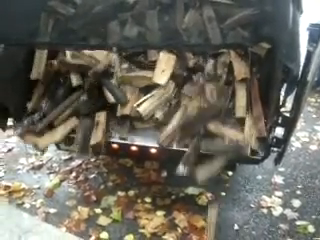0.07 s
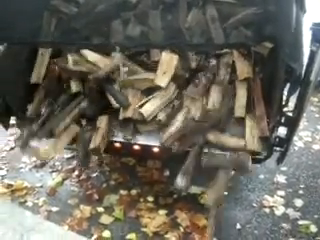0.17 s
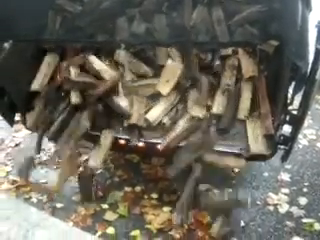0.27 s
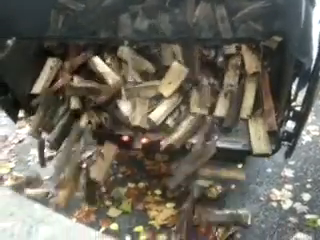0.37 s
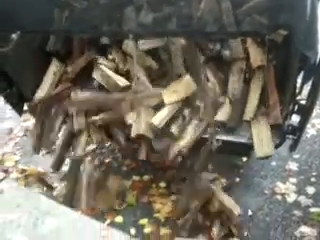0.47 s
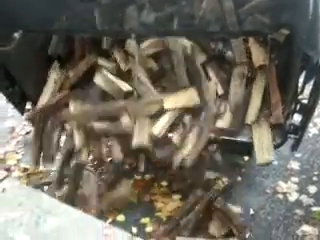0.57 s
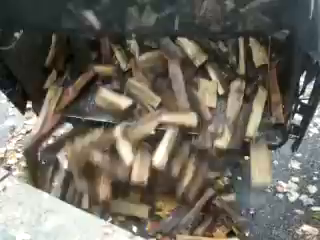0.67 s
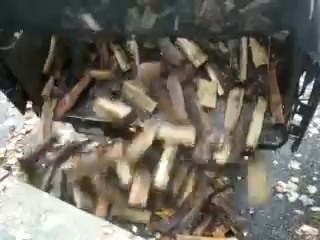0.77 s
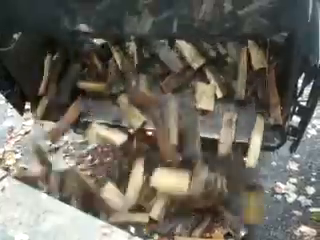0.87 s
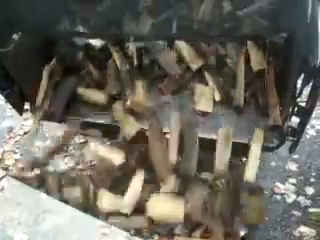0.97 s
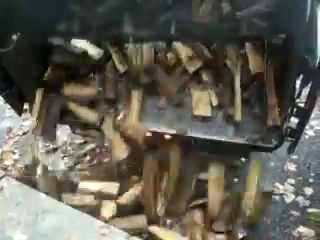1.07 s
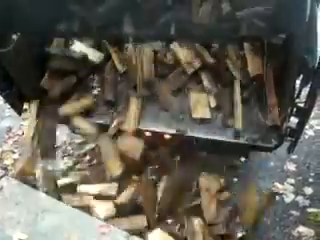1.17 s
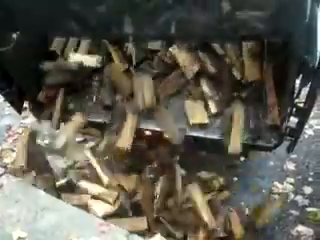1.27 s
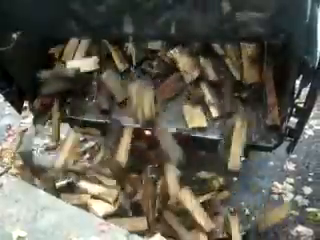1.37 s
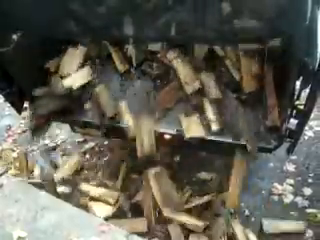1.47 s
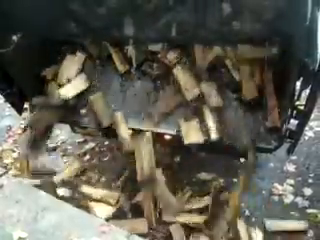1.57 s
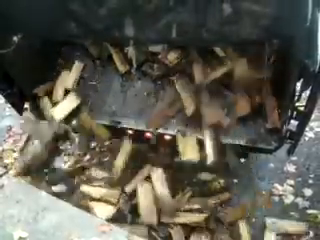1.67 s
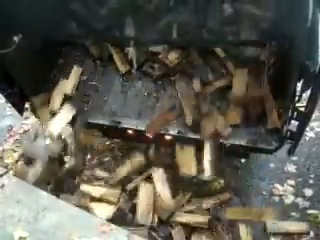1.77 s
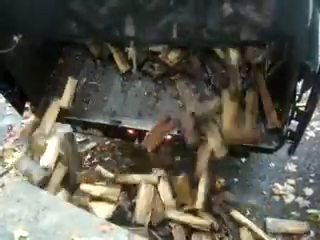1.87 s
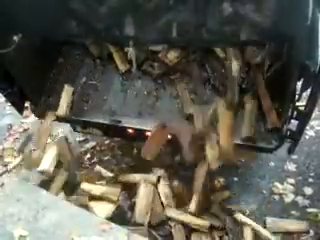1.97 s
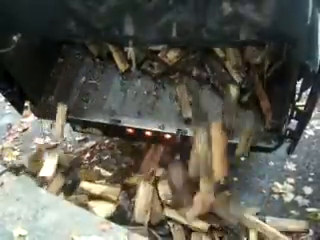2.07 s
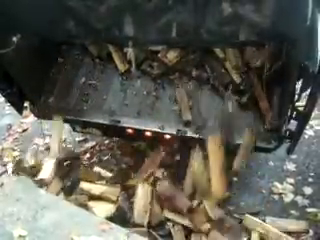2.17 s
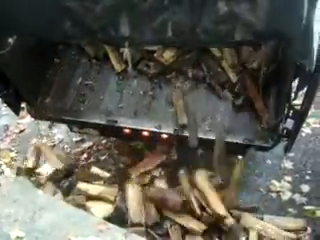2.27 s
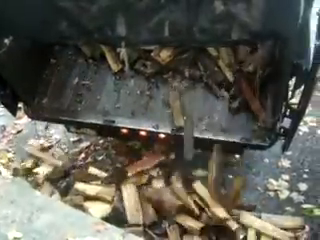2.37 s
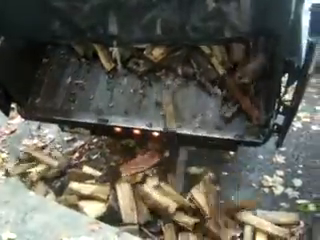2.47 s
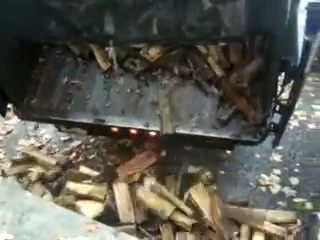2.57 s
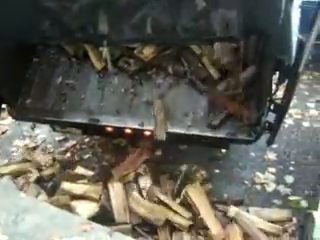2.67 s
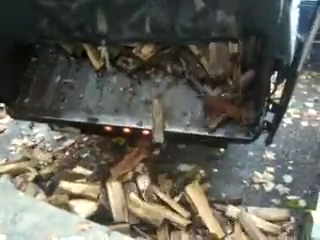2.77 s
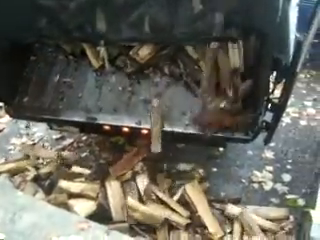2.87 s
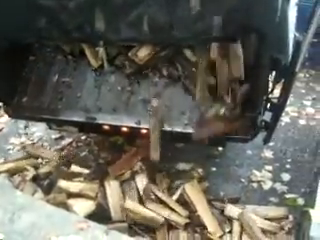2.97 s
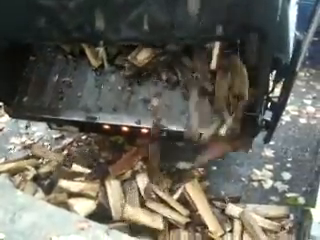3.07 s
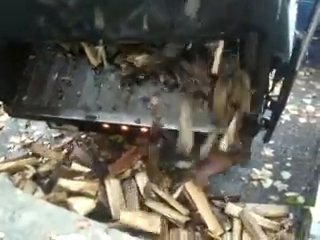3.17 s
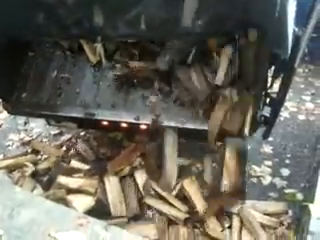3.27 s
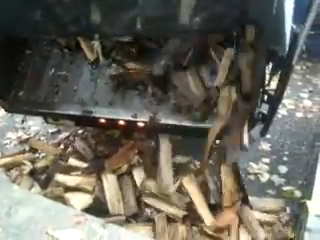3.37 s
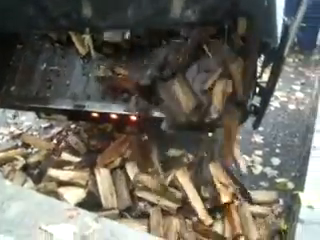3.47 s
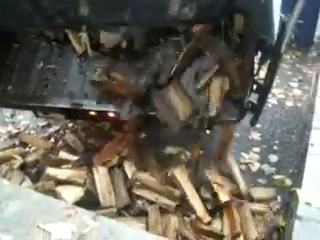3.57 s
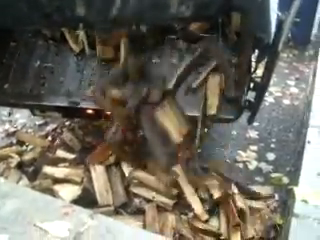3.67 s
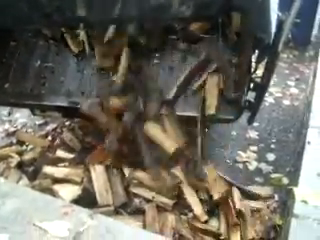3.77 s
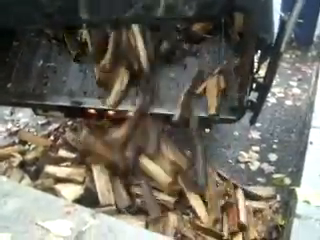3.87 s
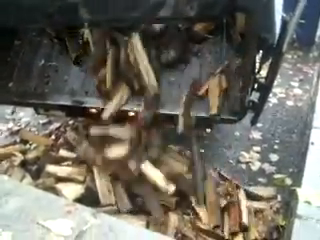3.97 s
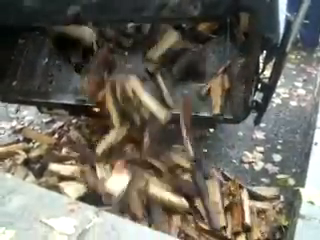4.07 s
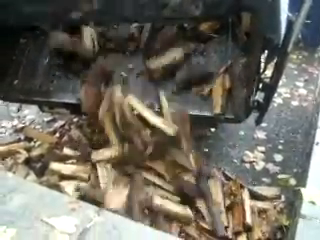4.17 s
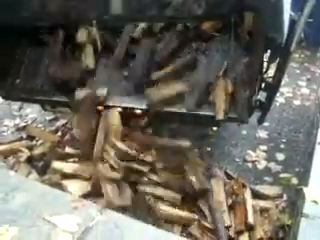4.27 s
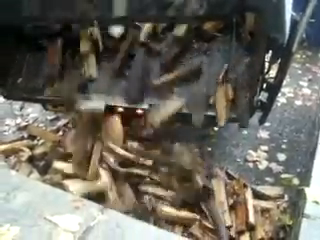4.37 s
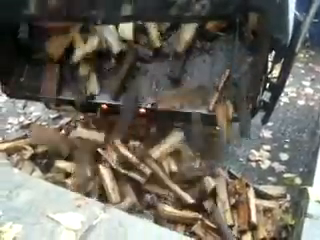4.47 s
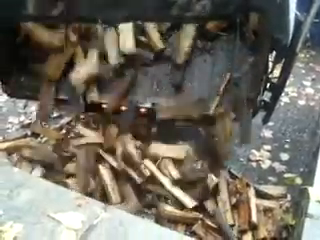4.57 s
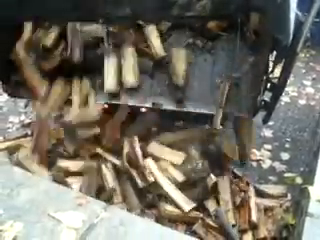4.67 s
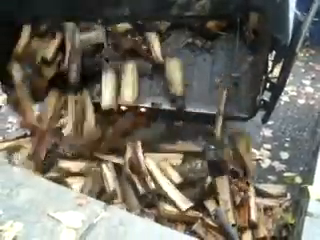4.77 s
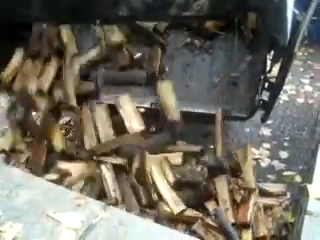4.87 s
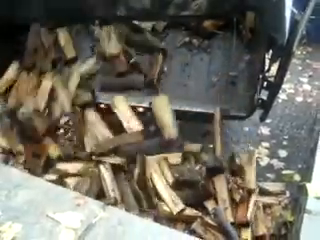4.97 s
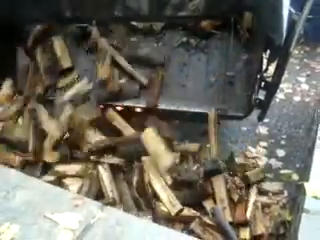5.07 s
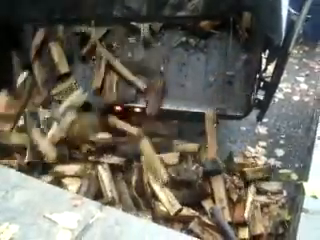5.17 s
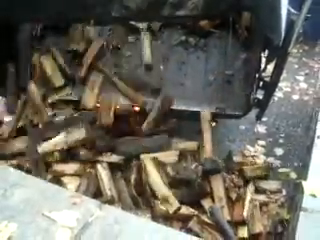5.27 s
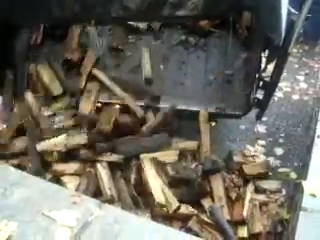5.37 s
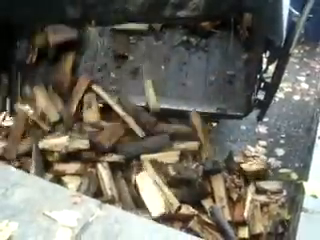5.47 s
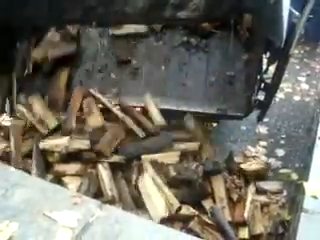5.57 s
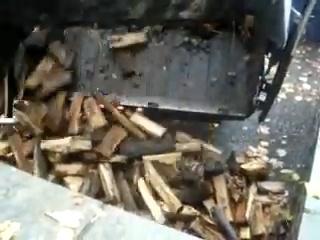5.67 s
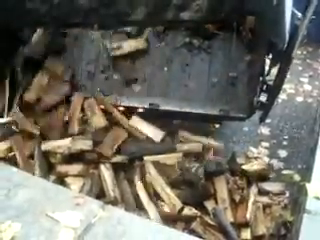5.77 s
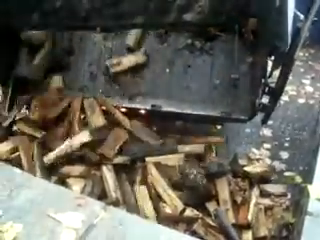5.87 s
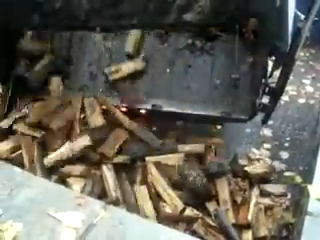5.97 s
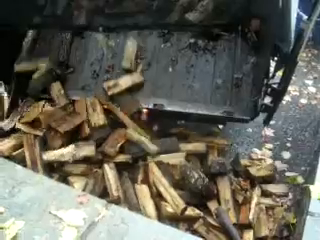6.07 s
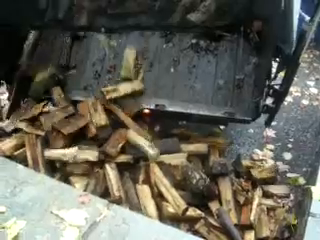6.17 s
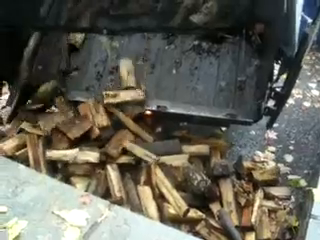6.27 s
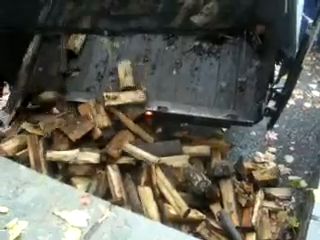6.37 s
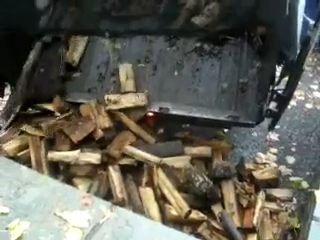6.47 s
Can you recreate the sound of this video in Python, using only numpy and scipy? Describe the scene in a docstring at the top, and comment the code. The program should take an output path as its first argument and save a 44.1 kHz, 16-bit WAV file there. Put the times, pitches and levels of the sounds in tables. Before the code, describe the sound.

Starting with a loud crack, a load of logs rumbles and scrapes down a steel truck bed, knocking together and thudding onto a woodpile. The sharpest snap comes about two seconds in, followed by a short lull, then a second rush that tapers to lighter knocks. It is outdoors with a brief echo off walls, picked up by a small microphone with thin bass, little treble and slight distortion on peaks.

```python
"""Split firewood slides down a tilted steel truck bed and tumbles onto a pile, outdoors.
It opens on a hard crack over a wash of rumble, clatter and bark scraping on steel. Logs clack and snap
together, thud on the booming bed and pile, and now and then ring hollow. The sharpest snap hits near 2 s;
the slide lulls near 2.7 s, builds again and thins out after 6 s. Nearby walls add a short echo throughout,
and a small narrow-band camera with a DC offset overloads on the hardest blows."""
import sys
import numpy as np
from scipy import signal
from scipy.fft import rfft, irfft, next_fast_len
from scipy.io import wavfile
from scipy.ndimage import map_coordinates

SR = 44100
rng = np.random.default_rng(int(sys.argv[2]) if len(sys.argv) > 2 else 0)


def transcribe(signal):
    """Save signal, clipped to [-1, 1], as a 16-bit WAV file at the path in sys.argv[1]."""
    frames = np.atleast_2d(signal).T
    limited = np.clip(frames, -1, 1)
    pcm = np.round(limited * 32767).astype(np.int16)
    wavfile.write(sys.argv[1], SR, pcm)


N = 287091

# hard wood-on-wood hits: (time [s], level [dB], pitch [Hz])
CLACK_HITS = [(0.0082, 12.5, 2160), (0.082, -12, 2110), (0.3867, -0.5, 2830), (0.412, -4, 2560),
              (0.4373, 4, 1713), (0.4445, 6.5, 1700), (0.4989, 2.5, 2480), (0.541, -6, 1690),
              (0.553, -10, 2300), (0.5896, 3, 3070), (0.6692, -14.5, 1826), (0.821, -5, 2870),
              (0.829, -4, 1773), (0.8339, 12, 2570), (0.8831, -4.5, 1750), (0.972, -8.5, 2460),
              (1.038, -5.5, 2300), (1.1056, -4, 2900), (1.1178, 13.5, 2570), (1.229, -6.5, 1517),
              (1.245, -12.5, 1970), (1.298, -2.5, 3060), (1.317, -6, 2126), (1.4295, -3, 1830),
              (1.461, -10.5, 2160), (1.569, -14.5, 1925), (1.6376, -6, 1805), (1.6627, -8, 2850),
              (1.7719, -10.5, 2000), (1.8039, -0.5, 1702), (1.811, -8, 3340), (1.833, -17, 1750),
              (1.88, -10, 2010), (1.9251, -2, 2406), (1.9332, -3, 1717), (1.978, -9, 2400),
              (2.0156, -4, 3100), (2.0575, 2.5, 2780), (2.0641, -3.5, 1733), (2.076, 7.5, 2530),
              (2.0876, 2, 1317), (2.3178, -12.5, 1624), (2.3942, -2, 1168), (2.495, -12, 1894),
              (2.5078, -1, 1222), (2.5262, -1, 1916), (2.5332, 2.5, 1860), (2.5696, 1, 3230),
              (2.606, -11, 2940), (2.618, -2.5, 3410), (2.631, -13, 3060), (2.749, -16, 2920),
              (2.7733, -1, 2150), (2.848, -16, 1790), (2.872, -14, 2300), (2.8918, -8.5, 2800),
              (3.0479, -11.5, 1372), (3.128, -9, 2470), (3.1696, -5, 3040), (3.2803, -3.5, 2120),
              (3.352, -5, 2520), (3.3879, -4.5, 2560), (3.508, -5, 2505), (3.638, -8, 2560),
              (3.6462, -7.5, 2010), (3.7675, 0.5, 1184), (3.7748, -7.5, 2860), (3.798, -16.5, 1985),
              (3.8784, -5.5, 2590), (3.9924, -1, 2470), (4.065, -13.5, 2770), (4.2035, -5.5, 1496),
              (4.275, -6, 2300), (4.291, -4, 1613), (4.364, -9, 2740), (4.3857, -3, 1400),
              (4.426, -7, 3100), (4.4731, -10, 2870), (4.526, -9, 1860), (4.5393, -9.5, 1270),
              (4.541, -13.5, 3050), (4.614, -9, 2360), (4.628, -5, 2910), (4.6915, 6, 2234),
              (4.7469, -1, 2485), (4.897, -6, 2326), (4.9068, -8.5, 1177), (4.918, -3.5, 1395),
              (5.0382, -6.5, 2560), (5.083, -7, 2445), (5.131, -10, 2880), (5.178, -13, 2870),
              (5.2, -13, 1860), (5.252, -11, 3020), (5.451, -8, 2310), (5.479, -2.5, 3110),
              (5.4867, -6, 2350), (5.5316, -8.5, 2175), (5.625, -12.5, 1810), (5.671, -14.5, 1400),
              (5.8241, -9, 2606), (5.916, -9.5, 1500), (6.0757, -9, 1577), (6.125, -13.5, 1657),
              (6.1792, -8.5, 2020), (6.237, -16, 2530), (6.272, -17, 1305), (6.3531, -7, 2615),
              (6.395, -18.5, 2025), (6.418, -10.5, 2540)]
# heavy landings: (time [s], level [dB], pitch [Hz])
THUD_HITS = [(0.011, 3.5, 265), (0.011, 6.5, 647.4), (0.207, 3, 263.3), (0.269, 2.5, 280),
             (0.291, -4.5, 502), (0.312, 0.5, 310.4), (0.352, -1, 298), (0.547, -3, 294), (0.629, -6, 331),
             (0.667, -3.5, 580), (0.768, -7, 1015), (0.884, 3, 686), (0.905, 2.5, 296.3),
             (0.962, -0.8, 720), (1.036, 0.5, 298.4), (1.049, -3, 559), (1.081, -6, 517), (1.174, 0, 736),
             (1.306, -4, 281.6), (1.328, -0.5, 275.7), (1.349, -1.5, 795), (1.349, -1.5, 482),
             (1.391, -10, 740), (1.427, -1.5, 1098), (1.444, 0.5, 298.6), (1.457, -2, 568),
             (1.481, 3.5, 658), (1.491, -1, 987), (1.502, -4, 304), (1.568, -5, 772), (1.671, -5, 307.6),
             (1.764, -9.5, 274), (1.813, -3, 386), (1.944, -1, 791), (1.976, -1, 1037), (2.002, -1.5, 562),
             (2.033, -1, 641), (2.172, -11.5, 988), (2.196, -5.5, 340), (2.214, -7, 520), (2.229, -5, 302),
             (2.34, 0, 277.5), (2.352, 1, 564), (2.356, -4.5, 723), (2.496, -7, 618), (2.523, -7, 430),
             (2.625, -6.5, 215), (2.676, -12, 750), (2.747, -13.5, 349), (2.81, -10.5, 722),
             (3.003, -10, 687), (3.05, -3, 555), (3.067, -0.5, 294), (3.262, -4.5, 290), (3.283, -1.5, 273),
             (3.307, 0, 186.6), (3.393, 2.5, 433), (3.413, 1.5, 252), (3.432, 0, 552), (3.502, -3, 312),
             (3.504, -4.5, 681), (3.515, -5, 293.3), (3.53, -6, 459), (3.538, 2, 805), (3.595, -8.5, 265),
             (3.63, -7, 470), (3.765, -6.5, 207), (3.838, -10.5, 1150), (3.877, 1, 225.5),
             (3.967, -7.5, 545), (3.967, -11, 1084), (4.081, -7, 1035), (4.116, -4, 255.6),
             (4.138, 3.5, 275), (4.138, -6, 644), (4.175, -1, 279), (4.287, 3, 208), (4.31, -2.5, 296),
             (4.345, -5.5, 269.4), (4.39, -5.5, 330), (4.428, -4.5, 754), (4.468, -3.5, 234),
             (4.47, -2.5, 527), (4.487, -2, 438), (4.527, -3, 493), (4.543, 0, 631), (4.553, 3, 266),
             (4.57, -0.5, 278), (4.607, 0, 286.5), (4.66, -1.5, 708), (4.726, -1.5, 749),
             (4.76, 0.5, 292.4), (4.813, -6.5, 484), (4.901, 1.5, 263.3), (4.908, -3, 675),
             (4.916, -1, 929), (4.992, -5, 442), (5.163, 0.5, 261.6), (5.206, 0, 500), (5.256, -3.5, 258),
             (5.258, -2, 455), (5.279, 2, 251.5), (5.313, -7, 744), (5.382, -4, 267), (5.448, 3, 391),
             (5.498, 0.5, 699), (5.543, -8.5, 473), (5.566, -11.5, 964), (5.617, -7, 616),
             (5.671, 2.5, 268), (5.762, -9, 268.4), (5.845, 2, 369), (5.915, -7.5, 757), (5.983, -1.5, 269),
             (6.035, -0.9, 715), (6.076, 2.5, 327), (6.126, 4, 280.4), (6.137, -2, 479), (6.238, -6, 418),
             (6.269, -3, 548), (6.326, -12, 394), (6.394, -8.5, 553), (6.438, -10, 318)]
# logs ringing freely: (time [s], level [dB], pitch [Hz], nominal ring time [s])
CLONK_HITS = [(0.293, -2, 691, 0.038), (0.41, -3.5, 296, 0.1), (0.732, -3.5, 275, 0.093),
              (1.039, -7.5, 1032, 0.13), (1.664, -6, 1041, 0.11), (1.813, -2, 689, 0.051),
              (2.257, -6, 731, .05), (2.573, -2, 1100, 0.024), (2.575, -13.5, 635, 0.13),
              (3.301, -16.5, 1160, 0.057), (3.389, -2.5, 1555, 0.022), (3.798, -0.5, 808, 0.029),
              (4.206, -4, 680, 0.031), (4.224, -3, 570.5, 0.15), (4.473, -13, 1460, 0.11),
              (4.614, -2, 715, 0.077), (5.039, -6, 1237, 0.052), (5.2, -0.5, 694, 0.041),
              (5.445, -1.5, 1038, 0.017), (5.685, 2.5, 510, 0.044), (5.921, 0, 226, 0.084)]


def amp(db):
    """Decibels to gain."""
    return 10 ** (np.asarray(db) / 20)


def unit(x):
    """Scale to an rms of 1."""
    return x / np.sqrt(np.mean(x ** 2) + 1e-20)


def along(points, hz):
    """Read a curve of (frequency [Hz], value) points on a log frequency axis."""
    freqs, values = np.transpose(points)
    return np.interp(np.log(hz + 1), np.log(freqs + 1), values)


def filtered(x, response):
    """EQ x with a response given as a function of frequency."""
    size = next_fast_len(N + SR // 2)
    return irfft(rfft(x, size) * response(np.fft.rfftfreq(size, 1 / SR)), size)[:N]


def wobble(rate):
    """A smooth random curve with rate knots a second."""
    knots = rng.standard_normal(int(N * rate / SR) + 4)
    return map_coordinates(knots, [np.arange(N) * rate / SR])


def place(times, shapes):
    """Mix one row of samples per event onto the timeline."""
    at = np.round(times * SR).astype(int)[:, None] + np.arange(shapes.shape[1])
    return np.bincount(at.ravel(), shapes.ravel(), N + SR)[:N]


def contacts(count, centre_hz, spread, cycles, scatter_db):
    """Countless small knocks, each one damped mode of random pitch and size."""
    times = rng.random(count) * N / SR
    pitch, size = np.clip(rng.standard_normal((2, count, 1)), -2, 2)
    hz = centre_hz * np.exp(spread * pitch)
    t = np.arange(SR // 30) / SR
    grains = np.exp(-t * hz / cycles) * np.sin(2 * np.pi * hz * t) * (1 - np.exp(-t * hz))
    return unit(place(times, amp(scatter_db * size) * grains))


def bed_boom(x):
    """The steel bed and the hollows of the pile resonate under the wood."""
    # resonances: (centre [Hz], width [Hz], level [dB])
    modes = [(185, 16, 0), (286.3, 2.6, 7.5), (570, 43, -9), (653, 35, -27.5)]
    return filtered(x, lambda hz: sum(
        (-1) ** k * amp(db) * 1j * hz * width / (centre ** 2 - hz ** 2 + 1j * hz * width)
        for k, (centre, width, db) in enumerate(modes)))


def bark_scrape():
    """Bark sliding on steel: shaped noise with a flickering level."""
    # friction spectrum: (frequency [Hz], level [dB])
    spectrum = [(30, -20.5), (70, -2), (130, -4.5), (260, 2.5), (420, -10.5), (650, -1), (1400, -15.5),
                (2900, -14.5), (4400, -15), (6000, -33)]
    friction = unit(filtered(rng.standard_normal(N), lambda hz: amp(along(spectrum, hz))))
    return amp(3.5 + 2.69 * wobble(25)) * friction


def jostle(hits, lead_s, settle_s, strength_db):
    """Wood jostles around each blow: a gain that swells into the hit and settles after it."""
    times, db, _ = np.transpose(hits)
    pre_roll = SR // 10
    t = (np.arange(SR // 3) - pre_roll) / SR
    swell = np.exp(np.where(t < 0, t / lead_s, -t / settle_s))
    swell_db = np.minimum(db[:, None], -1.5) + strength_db
    power = place(times, amp(2 * swell_db) * swell)
    return np.sqrt(1 + np.pad(power[pre_roll:], (0, pre_roll)))


def tumble():
    """The wash of small contacts and scraping, riding the amount of wood in motion."""
    # flow of the load: (time [s], rumble level [dB], clatter level [dB])
    flow = [(0.0, -13.5, -20), (0.269, -16.5, -23), (0.621, -20, -29.5), (0.95, -17.5, -20),
            (1.201, -19.5, -19), (1.489, -17.5, -26.5), (1.741, -25, -26.5), (2.0, -15.5, -18.5),
            (2.14, -23.5, -31), (2.3, -21, -20), (2.46, -31.5, -27.5), (2.71, -42.5, -33.5),
            (2.95, -27, -30.5), (3.201, -25, -29), (3.5, -19.5, -22), (3.751, -24, -26.5),
            (4.07, -23.5, -26), (4.449, -16.5, -23.5), (4.752, -13, -23), (4.861, -20, -29),
            (5.148, -16.5, -20.5), (5.421, -15.5, -25), (5.761, -21.5, -30.5), (6.079, -12, -19.5),
            (6.239, -25, -30.5), (6.51, -26, -26.5)]
    times, rumble_db, clatter_db = np.transpose(flow)
    t = np.arange(N) / SR
    rumble = contacts(count=2500, centre_hz=423, spread=0.508, cycles=1.26, scatter_db=4)
    rumble = unit(rumble + amp(1.5) * bed_boom(rumble))
    ticks = contacts(count=2500, centre_hz=2011, spread=0.43, cycles=4, scatter_db=2.5)
    clatter = amp(-3.5) * ticks + bark_scrape()
    low_hits = THUD_HITS + [hit[:3] for hit in CLONK_HITS]
    rumble *= amp(np.interp(t, times, rumble_db))
    rumble *= jostle(low_hits, lead_s=0.021, settle_s=0.021, strength_db=-0.75)
    clatter *= amp(np.interp(t, times, clatter_db))
    clatter *= jostle(CLACK_HITS, lead_s=0.006, settle_s=0.015, strength_db=5.8)
    return amp(-0.5) * rumble + amp(-0.66) * clatter


def with_ring(hits, ring_s, at_hz, pitch_slope, growth_per_db):
    """Give each hit a nominal ring time, scaled from ring_s for a 0 dB blow pitched at at_hz."""
    return [(time, db, hz, ring_s * (hz / at_hz) ** pitch_slope * np.exp(growth_per_db * db))
            for time, db, hz in hits]


def struck_logs(hits, attack_s, crack_db, crack_t60, rough, decay_curve, side_modes_db, punch_db):
    """Every blow rings a log's modes at new strengths, over a burst of splintery noise."""
    # a log's modes: (pitch [ratio], level [dB], share of the ring time [ratio])
    modes = [(1, 2, 0.65), (1.6, -9, 0.99), (.7, -6, 0.78), (2.3, -9, 0.61)]
    times, db, hz, ring_s = np.transpose(hits)[:, :, None]
    t = np.arange(SR // 5) / SR
    draws = rng.standard_normal((len(hits), 2 * len(modes) + len(t)))
    noise = draws[:, 2 * len(modes):]
    smear = rough * np.cumsum(noise, axis=1) / np.sqrt(SR / 1000)  # loose contact smears the phase
    ring = 0
    for k, (ratio, mode_db, share) in enumerate(modes):
        pitch = hz * ratio ** (1 + 0.1432 * draws[:, [2 * k]])
        scatter_db = min(k + 0.5, 2) * np.clip(draws[:, [2 * k + 1]], -2, 1.5)
        # a curve below 1 drops fast and lingers; above 1 the log rings on until the pile grips it
        decay_db = 60 * (t / np.maximum(ring_s * share, 0.004)) ** decay_curve
        envelope = amp(mode_db + side_modes_db * (k > 0) + scatter_db - decay_db)
        ring += envelope * np.sin(2 * np.pi * pitch * t + smear)
    ring *= amp(punch_db * np.exp(-t * hz / 1.7))  # the first swings, while the logs still press together
    crack = amp(crack_db - 60 * t / crack_t60) * noise
    onset = 1 - np.exp(-t / attack_s)
    return place(times[:, 0], amp(db) * (ring + crack) * onset)


def clacks():
    """Log hits log, bright and splintery; higher and harder hits die sooner."""
    hits = with_ring(CLACK_HITS, ring_s=0.1238, at_hz=2007.5, pitch_slope=-0.76, growth_per_db=-0.05)
    return amp(-5.5) * struck_logs(hits, attack_s=0.00059, crack_db=5, crack_t60=0.022, rough=1.38,
                                   decay_curve=0.7, side_modes_db=2, punch_db=6)


def snaps():
    """Edge meets edge in a stiff contact of about a millisecond: two swings and gone."""
    # the sharpest blows: (time [s], level [dB])
    hits = [(0.011, 7.5), (0.29, -12), (0.4374, 1), (0.6699, 6.5), (0.829, 5), (1.038, -0.5), (1.1185, 5.5),
            (1.351, 6), (1.4814, -1.5), (1.4996, 1), (1.814, -3), (1.9274, 6), (2.076, 8.5), (2.087, 18),
            (2.341, -0.5), (3.389, 7.5), (3.504, -4), (3.5405, -2), (3.769, 7.5), (3.9909, 4.5),
            (4.2912, 5), (4.747, 8.5), (4.7763, 7.5), (4.903, 2), (4.9164, -1), (5.5009, 7.5), (5.532, 6.5),
            (5.6721, -8.5), (6.1258, -1), (6.1796, 6.5)]
    times, db = np.transpose(hits)
    t = np.arange(SR // 200) / SR
    click = np.sin(2 * np.pi * 1900 * t) * amp(-60 * t / 0.0017)
    return place(times, amp(db[:, None] + 1.5) * click)


def thuds():
    """Heavy landings set the bed booming; lower and harder hits ring longer."""
    hits = with_ring(THUD_HITS, ring_s=0.21, at_hz=301, pitch_slope=-0.29, growth_per_db=0.02)
    body = amp(-4.5) * struck_logs(hits, attack_s=0.0012, crack_db=-7.5, crack_t60=0.025, rough=0.36,
                                   decay_curve=0.82, side_modes_db=0.5, punch_db=4.5)
    return body + amp(-19) * bed_boom(body)


def clonks():
    """A log left free to ring gives a clean, hollow note."""
    return amp(-3.5) * struck_logs(CLONK_HITS, attack_s=0.0006, crack_db=-8.5, crack_t60=0.015,
                                   rough=0.064, decay_curve=1.76, side_modes_db=-6.5, punch_db=-0.5)


def wall_echo(x, count=24, predelay_s=0.0065):
    """Blows land all over the pile, so each stretch of time gets its own tail; the bass lasts longest."""
    # decay off nearby walls: (frequency [Hz], t60 [s])
    decay = [(200, 0.48), (1000, 0.13), (4000, 0.19)]
    hz, t, spectra = signal.stft(rng.standard_normal((count, SR // 2)), SR, nperseg=256)
    tails = signal.istft(spectra * amp(-60 * t / along(decay, hz)[:, None]), SR, nperseg=256)[1]
    tails /= np.linalg.norm(tails, axis=1, keepdims=True)
    step = N // count + 1
    stretches = np.pad(x, (0, step * count - N)).reshape(count, step)
    wet = signal.fftconvolve(stretches, tails, axes=1)
    return place(np.arange(count) * step / SR + predelay_s, wet)


def gain_control(x, knee_db, lag_s):
    """The camera ducks just after loud moments and recovers with the same lag."""
    pole = np.exp(-1 / (SR * lag_s))
    power = signal.lfilter([1 - pole], [1, -pole], x ** 2)
    return x / np.sqrt(1 + power / amp(knee_db) ** 2)


def narrow_band(hz, low_cut_hz=110, edge_hz=4700):
    """The camera's passband: thin bass, a droop above 3.2 kHz, then a steep edge."""
    droop_db = 17 * np.clip(hz / 1000 - 3.2, 0, 2)
    skirt_db = np.interp(hz, [edge_hz - 80, edge_hz + 80, 9000], [0, 11, 75])
    return amp(-droop_db - skirt_db) * hz ** 2 / (hz ** 2 + low_cut_hz ** 2)


def scene():
    """Single blows over the tumbling load, plus their echo, in mono."""
    wood = thuds() + clacks() + snaps() + clonks() + tumble()
    return (wood + amp(-12) * wall_echo(wood))[None]


def record(dry):
    """The camera: gain control lags, the preamp saturates, the band narrows, the converter clips."""
    # microphone tone: (frequency [Hz], gain [dB])
    mic_eq = [(30, -15), (100, -6.5), (160, -6), (250, -1.5), (3000, -2), (4500, 0.5)]
    dc_offset, ceiling, top_hz = -0.0364, 1.4, 16000
    picked_up = filtered(dry[0], lambda hz: amp(along(mic_eq, hz)))
    driven = amp(3) * gain_control(picked_up, knee_db=-9.5, lag_s=0.043)
    saturated = driven / (1 + np.abs(driven / ceiling) ** 5) ** (1 / 5)
    preamp_rumble = unit(filtered(rng.standard_normal(N), lambda hz: 1 / (1 + (hz / 70) ** 2)))
    narrow = filtered(saturated, narrow_band) + amp(-49) * preamp_rumble
    clipped = np.clip(narrow + dc_offset, -1, 1) - dc_offset  # the offset makes the clipping lopsided
    band_limited = filtered(clipped, lambda hz: np.clip((top_hz - hz) / 500, 0, 1) ** 2)
    return band_limited[None] + dc_offset


dry = scene()
out = record(dry)
transcribe(out)
```